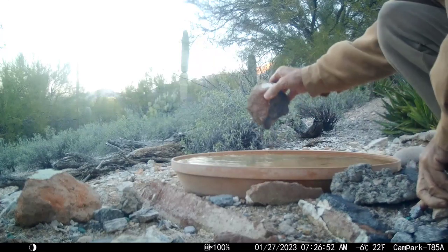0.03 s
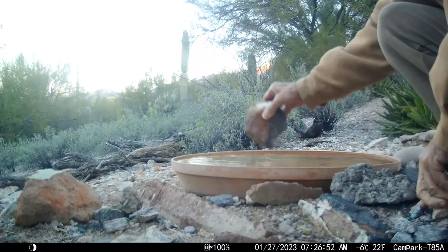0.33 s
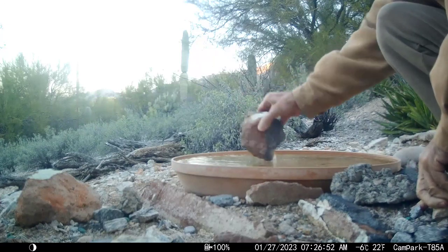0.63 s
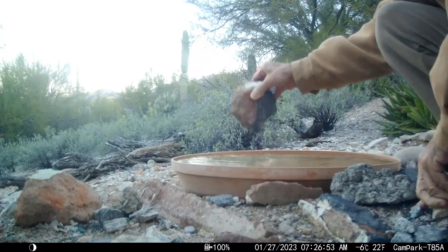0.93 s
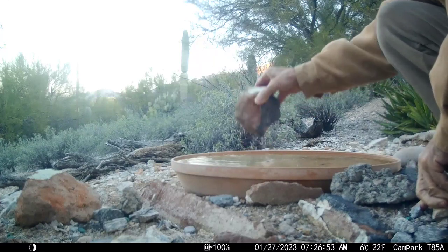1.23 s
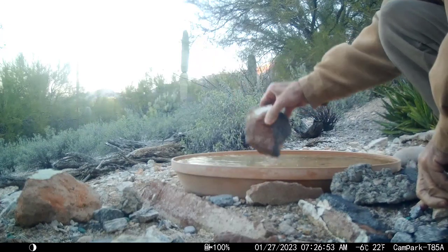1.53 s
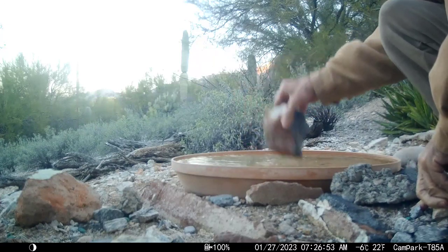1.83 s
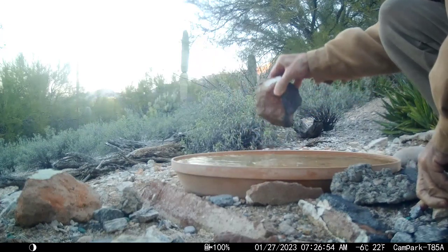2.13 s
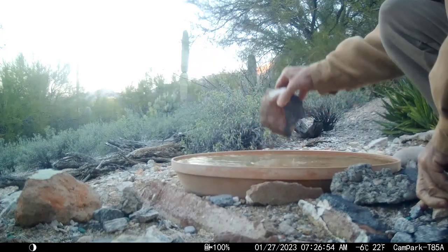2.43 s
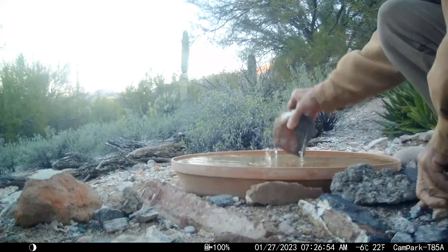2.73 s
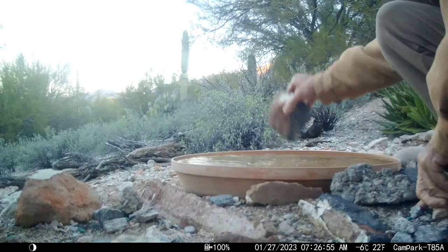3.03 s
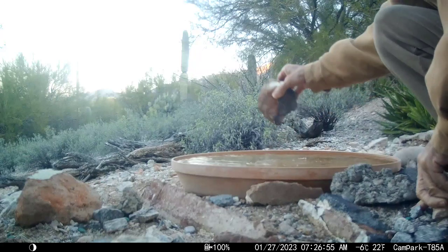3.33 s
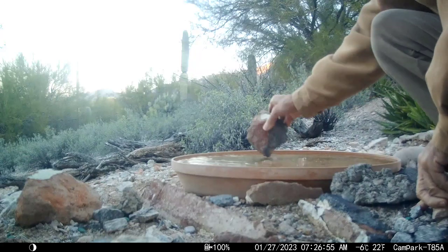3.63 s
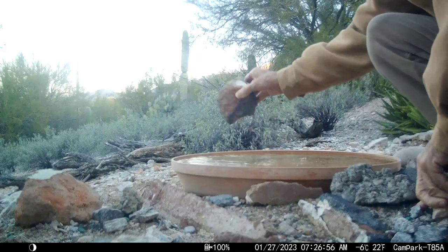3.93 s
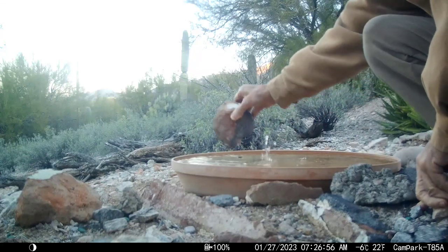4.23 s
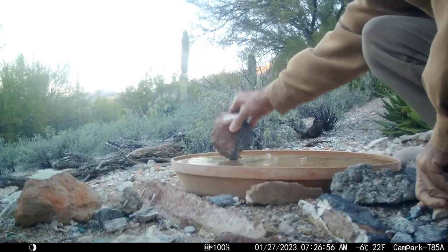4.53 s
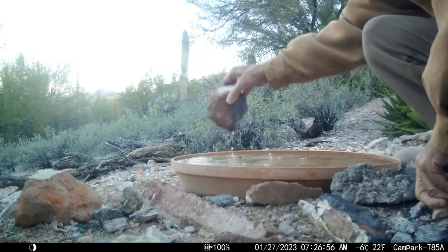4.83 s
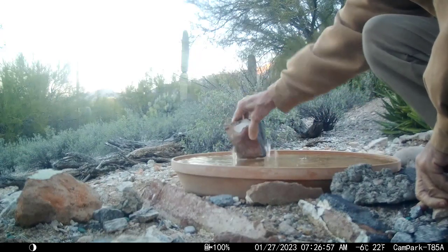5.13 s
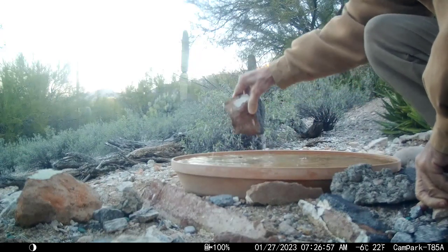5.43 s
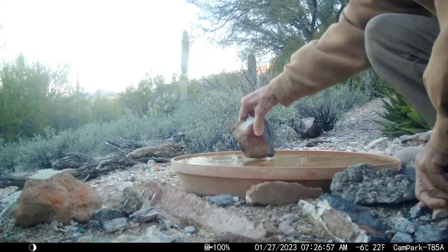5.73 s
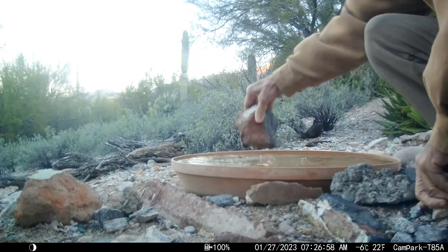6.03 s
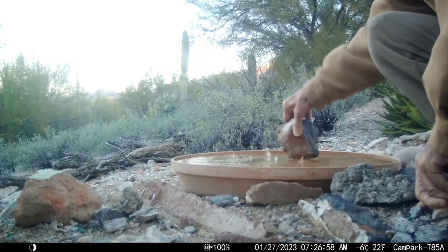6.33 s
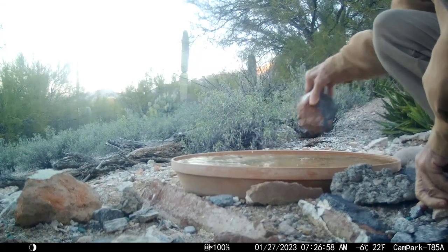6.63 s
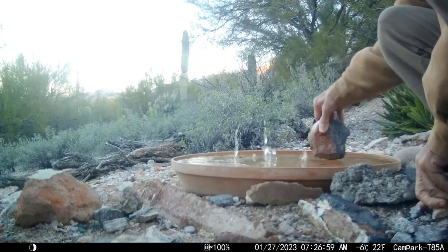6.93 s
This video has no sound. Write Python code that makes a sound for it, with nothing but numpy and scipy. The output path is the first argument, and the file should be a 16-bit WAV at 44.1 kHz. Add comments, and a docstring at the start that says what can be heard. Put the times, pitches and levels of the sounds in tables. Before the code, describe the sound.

Close by outdoors, a hand-held rock chops again and again at ice in a dish of water. Sharp cracks and short clacking knocks come in an even rhythm that eases a little toward the end. Between the hits, loose chips tick back onto the ice, fine spray falls, and small slaps and bubbles come from the water. A quiet hiss and low distant rumble lie behind, with no echo.

```python
"""Rock breaking ice in a dish

A hand-held rock strikes the ice in a shallow dish fifteen times, outdoors. Each impact excites the
modes of the dish and fractures the ice in a few bright snaps. Splinters and spray patter down, and
the water beneath slaps and plops as pockets of air resonate. Behind lie a faint rumble and an even hiss."""
import sys
import numpy as np
from scipy import signal
from scipy.fft import rfft, irfft
from scipy.io import wavfile

SR = 44100
rng = np.random.default_rng(int(sys.argv[2]) if len(sys.argv) > 2 else 0)


def pcm_store(signal):
    """Save signal as 16-bit PCM."""
    levels = np.round(np.clip(np.atleast_2d(signal), -1, 1) * 32767)
    wavfile.write(sys.argv[1], SR, levels.astype(np.int16).T)


N = 307818
AGE = np.arange(SR // 2) / SR   # time since the onset of an event [s]

# Levels in the tables are relative: each source applies its own gain.
# blows of the rock: (time [s], snap level [dB], snap ring [Hz], gap between the first two snaps [s],
# knock level [dB], knock pitch [Hz], clack level [dB], body level [dB], sway pitch [Hz], spray level [dB])
ROCK_BLOWS = [(0.272, -21, 5220, 0.004, -36.5, 1240, -38.5, -48, 68.6, -53.5),
              (0.6717, -22, 5100, 0.0046, -35.5, 950, -40, -43.5, 74, -54),
              (1.0891, -23, 5460, 0.004, -35.5, 1210, -39, -43, 115, -52.5),
              (1.511, -25, 6600, .003, -35, 940, -39.5, -43.5, 102, -51.5),
              (1.9138, -24.5, 5180, 0.0036, -37, 860, -54, -38.5, 82, -49.5),
              (2.3251, -31.5, 6300, 0.0029, -38, 925, -41, -39.5, 74, -52.5),
              (2.7327, -22.5, 6070, .002, -34, 1210, -44, -43, 167, -49.5),
              (3.1463, -22, 4800, .002, -35, 1020, -56, -42, 115, -47.5),
              (3.632, -24, 5400, .0025, -40.5, 1390, -37, -44.5, 107, -52),
              (4.1227, -20.5, 6000, 0.005, -37, 820, -37, -44, 89, -48.5),
              (4.5885, -22, 6900, 0.0047, -35, 930, -39, -50, 83, -45),
              (5.169, -25, 6700, 0.0043, -36.5, 940, -40.5, -44.5, 139, -45),
              (5.7769, -29.5, 5540, 0.0016, -47, 935, -50, -45.5, 87, -52),
              (6.378, -28, 6650, 0.0042, -39.5, 940, -46, -48.5, 95, -48.5),
              (6.9012, -26, 5570, 0.0044, -35, 1090, -34, -45, 159.6, -43.5)]
# the rock grinding on into broken ice: (time [s], level [dB], treble relative to that level [dB])
ICE_CRUNCHES = [(0.3086, -38, -6.5), (0.695, -36.5, -25), (0.7075, -38, -1.5), (1.1186, -38.5, -5),
                (1.5717, -44, -6), (1.927, -28, -33), (2.3358, -30.5, -4.5), (2.352, -33, -2.5),
                (2.759, -36.5, -3.5), (3.161, -40, -20), (3.198, -39, -5), (3.679, -43.5, -2.5),
                (4.1733, -31, -7), (4.6478, -31.5, -9), (5.185, -26.5, -5), (5.2233, -40.5, -3),
                (5.2425, -36, -6.5), (6.448, -45, -3), (6.492, -46, -29), (6.9077, -23.5, -7),
                (6.929, -41, -3)]
# loose chips falling back on the ice: (time [s], level [dB])
FALLING_CHIPS = [(0.7185, -42), (0.733, -45), (1.1657, -52), (2.009, -50.5), (2.831, -54), (3.7143, -48.5),
                 (4.211, -51), (4.255, -51.5), (4.643, -44), (4.658, -36), (5.2782, -49.5), (5.978, -54.5),
                 (6.954, -44), (6.978, -40)]
# water slapping back into the hole: (time [s], level [dB])
WATER_SLAPS = [(0.317, -44.5), (0.699, -41.5), (1.127, -52), (1.939, -36), (2.353, -37), (2.779, -44),
               (3.192, -34.5), (3.681, -42.5), (5.22, -43.5), (6.428, -35.5), (6.954, -45)]
# single bubbles and drips: (time [s], level [dB], starting pitch [Hz])
SINGLE_BUBBLES = [(2.335, -38, 1240), (4.291, -55.5, 4000), (4.76, -55, 1580), (5.236, -40.5, 2830),
                  (5.2437, -33.5, 1283), (6.428, -42, 1100), (6.511, -57, 1890), (6.629, -62, 4700),
                  (6.8428, -47.5, 1630)]
# normal modes of the ice: (frequency [Hz], bandwidth [Hz], added gain [ratio])
ICE_RESONANCES = [(5055, 130, 0.44), (5460, 98, 0.29), (6990, 140, 0.63), (8350, 16, 0.12)]

# spectral envelopes: (frequency [Hz], spectral level [dB])
AIR_SPECTRUM = [(12, -41), (20, -6), (87, -3), (122, -0.5), (180, -7), (306, -10.5), (372, -14.5),
                (439, -16.5), (705, -17.5), (1300, -24.5), (1410, -25.5), (1720, -28.5), (4810, -31),
                (13500, -31), (15500, -35.5)]   # outdoor rumble and hiss
ICE_SPECTRUM = [(1200, -18.5), (2400, -16), (3050, -17.5), (3300, -22), (4000, -9), (5200, -3), (6100, -5),
                (7200, -8), (8300, -6.5), (8900, -33), (16000, -86)]   # snapping ice
SPLINTER_SPECTRUM = [(3000, -30), (7000, -21), (9000, 4.5), (10800, 4), (12000, -7), (14000, -0.5),
                     (16000, -19)]   # treble of fine splinters
KNOCK_SPECTRUM = [(300, -9), (480, 1), (600, 2.5), (740, -1), (900, 5.5), (1150, -2), (1350, 1),
                  (1550, -15.5), (2100, -14.5), (3000, -11.5), (5000, -46)]   # midrange of the struck ice and dish
BODY_SPECTRUM = [(100, -8), (200, 0), (290, -0.5), (400, -2.5), (550, -10.5), (1200, -49)]   # body of the dish
CLACK_SPECTRUM = [(900, -21), (1400, 7), (1700, 6), (2000, -3.5), (2350, 0.5), (2700, -2.5), (3000, 0.5),
                  (3300, -4), (4500, -24.5)]   # hard contact of the rock
THUD_SPECTRUM = [(25, -34.5), (55, -3), (95, -5.5), (165, -2.5), (240, -7.5), (400, -10), (800, -18.5),
                 (1500, -24), (4000, -49)]   # bass of the impact
SPRAY_SPECTRUM = [(300, -16.5), (800, -6.5), (1300, -11.5), (1700, -11.5), (2700, -11.5), (3400, -15),
                  (4200, -6), (5400, 0), (6800, -3), (8300, -7.5), (10500, -8.5), (12000, -17),
                  (16000, -23)]   # falling splinters and drops
SLAP_SPECTRUM = [(100, -7), (250, 8), (500, -4.5), (900, -2), (1400, -6.5), (2000, -7.5), (3500, -18.5),
                 (8000, -26)]   # slapping water


def from_db(db):
    """Amplitude ratio of a level: a factor of ten for every 20 dB."""
    return 10 ** (np.asarray(db) / 20)


def rms_one(x):
    """Normalisation to unit mean power."""
    return x / np.sqrt(np.mean(x ** 2) + 1e-20)


def add(track, s, sound):
    """Superposition: a sound adds to the track from time s on."""
    start = int(round(s * SR))
    track[start:start + len(sound)] += sound[:max(N - start, 0)]


def colour(x, spectrum, size=4096):
    """Minimum-phase filtering to a spectral envelope; white noise keeps its power."""
    hz, db = np.transpose(spectrum)
    bins_hz = np.maximum(np.arange(size // 2 + 1) * SR / size, 1)
    magnitude = from_db(np.interp(np.log(bins_hz), np.log(hz), db))
    cepstrum = irfft(np.log(magnitude))
    cepstrum[1:size // 2] *= 2   # folding onto positive time makes the response causal
    cepstrum[size // 2 + 1:] = 0
    response = irfft(np.exp(rfft(cepstrum)))
    return signal.fftconvolve(x, response / np.linalg.norm(response))[:len(x)]


def resonate(x, hz, width_hz):
    """Forced response of a damped oscillator, with unit gain at resonance."""
    r = np.exp(-np.pi * width_hz / SR)
    numerator = np.array([1, 0, -1]) * (1 - r * r) / 2
    return signal.lfilter(numerator, [1, -2 * r * np.cos(2 * np.pi * hz / SR), r * r], x)


def ringing(x, hz, width_hz, gain):
    """Resonant emphasis: the response of one mode adds to the direct sound."""
    return x + gain * resonate(x, hz, width_hz)


def swell(rise_s, t60):
    """Smooth onset under an exponential decay of 60 dB in t60 seconds."""
    return (1 - np.exp(-(AGE / rise_s) ** 2)) * from_db(-60 * AGE / t60)


def grains(per_s, spread_db):
    """Shot noise: independent impulses of uneven size, at unit power."""
    sizes = from_db(spread_db * np.minimum(rng.exponential(1, len(AGE)), 4))
    signs = rng.choice([-1, 1], len(AGE))
    occurs = rng.random(len(AGE)) < per_s / SR
    return rms_one(sizes * signs * occurs)


def at_level(sound, envelope, db):
    """Energy scaling: a sound takes the energy of its envelope, shifted by db."""
    return sound * from_db(db) * np.linalg.norm(envelope) / (np.linalg.norm(sound) + 1e-12)


def burst(envelope, spectrum):
    """Source and filter: a dense run of tiny contacts is heard through a body."""
    return colour(envelope * grains(per_s=20000, spread_db=1.5), spectrum)


def air(level_db=-57):
    """Stationary noise: distant outdoor rumble under an even microphone hiss."""
    noise = colour(rng.standard_normal(N + SR), AIR_SPECTRUM)[SR:]
    return from_db(level_db) * rms_one(noise)


def fractures(run_on_count=3, run_on_gap_s=0.004, run_on_db=-12, loss_db=5.5,
              crunch_hz=5900, crumble_s=0.007, crumble_db=-9):
    """Brittle failure proceeds in steps: blows and crunches run on in weaker snaps; chips strike once."""
    # rows: (time [s], level [dB], ring [Hz], relative treble [dB], t60 [s])
    chip_hz, chip_treble_db, chip_t60 = 5550, -5, 0.025
    snap_treble_db, snap_t60, crunch_t60 = -49, 0.018, 0.03
    rows = [(s, db, chip_hz, chip_treble_db, chip_t60) for s, db in FALLING_CHIPS]
    for s, db, hz, gap_s, *_ in ROCK_BLOWS:
        rows += [(at, db, hz, snap_treble_db, snap_t60) for at in (s, s + gap_s)]
        run_on_times = s + gap_s + np.cumsum(run_on_gap_s * (0.5 + rng.random(run_on_count)))
        for k, at in enumerate(run_on_times):
            rows.append((at, db + run_on_db - loss_db * k, crunch_hz, snap_treble_db, snap_t60))
    for s, db, treble_db in ICE_CRUNCHES:
        hz = crunch_hz * np.exp(0.05 * rng.standard_normal())
        crumble_at = s + crumble_s * (0.5 + rng.random())
        rows += [(s, db, hz, treble_db, crunch_t60),
                 (crumble_at, db + crumble_db, hz, treble_db, crunch_t60)]
    return rows


def ice_cracks(ice_db=2.5, splinter_db=1.0):
    """Acoustic emission: fractures excite the modes of the ice and a ring set by the breaking piece."""
    out = np.zeros(N)
    for s, db, hz, treble_db, t60 in fractures():
        envelope = swell(rise_s=0.00021, t60=t60)
        snap = ringing(burst(envelope, ICE_SPECTRUM), hz, width_hz=400, gain=1.0)
        for mode in ICE_RESONANCES:
            snap = ringing(snap, *mode)
        splinters = burst(envelope, SPLINTER_SPECTRUM)
        add(out, s, at_level(snap, envelope, db + ice_db))
        add(out, s, at_level(splinters, envelope, db + treble_db + splinter_db))
    return out


def dish_knocks(knock_gain_db=5.0, clack_gain_db=8.5, body_gain_db=8.0,
                thud_gain_db=-4.5, sway_gain_db=-1.0):
    """Impact excitation: the rock loads the ice sheet and dish, whose lowest vibrations last longest."""
    out = np.zeros(N)
    clack_shape = swell(rise_s=0.0031, t60=0.039)
    knock_shape = swell(rise_s=0.0023, t60=0.048)
    body_shape = swell(rise_s=0.00088, t60=0.042)
    thud_shape = swell(rise_s=0.0025, t60=0.49)
    sway_shape = swell(rise_s=0.013, t60=0.2)
    for s, _, _, _, knock_db, knock_hz, clack_db, body_db, sway_hz, _ in ROCK_BLOWS:
        impact_db = (knock_db + body_db) / 2
        # which modes ring most depends on where the rock lands
        body_hz = 283 * np.exp(0.068 * rng.standard_normal())
        knock = ringing(burst(knock_shape, KNOCK_SPECTRUM), knock_hz, width_hz=130, gain=1.0)
        body = ringing(burst(body_shape, BODY_SPECTRUM), body_hz, width_hz=70, gain=2.7)
        clack = burst(clack_shape, CLACK_SPECTRUM)
        thud = burst(thud_shape, THUD_SPECTRUM)
        sway = sway_shape * np.sin(2 * np.pi * sway_hz * AGE)   # the sheet oscillates on the water
        add(out, s, at_level(knock, knock_shape, knock_db + knock_gain_db))
        add(out, s, at_level(body, body_shape, body_db + body_gain_db))
        add(out, s, at_level(clack, clack_shape, clack_db + clack_gain_db))
        add(out, s, at_level(thud, thud_shape, impact_db + thud_gain_db))
        add(out, s, at_level(sway, sway_shape, impact_db + sway_gain_db))
    return out


def spray(patter_db=7.0, drops_db=-13.5, drop_hz=5400, pitch_spread=0.27, pitch_count=6):
    """Random impacts: splinters and water patter after each blow; later drops set the ice ringing."""
    out = np.zeros(N)
    for s, *_, db in ROCK_BLOWS:
        patter = swell(rise_s=0.016, t60=0.32) * grains(per_s=3000, spread_db=2.5)
        pitches = drop_hz * np.exp(pitch_spread * rng.standard_normal(pitch_count))
        taps = sum(resonate(grains(per_s=45, spread_db=7.5), hz, width_hz=520) for hz in pitches)
        drops = swell(rise_s=0.041, t60=0.52) * rms_one(taps)
        add(out, s, from_db(db) * (from_db(patter_db) * patter + from_db(drops_db) * drops))
    return colour(out, SPRAY_SPECTRUM)


def air_pockets(slosh_delay_s=0.068, slosh_db=-17.5):
    """Air entrainment: water closes in slaps, in a weaker slosh after each, and in single bubbles."""
    # rows: (time [s], level [dB], pitch [Hz], tonal share of the energy [0-1], t60 [s])
    slap_hz, slap_tonal, slap_t60 = 824, 0.04, 0.044
    bubble_tonal, bubble_t60 = 0.61, 0.038
    slaps = [(s, db, slap_hz, slap_tonal, slap_t60) for s, db in WATER_SLAPS]
    sloshes = [(s + slosh_delay_s, db + slosh_db, *rest) for s, db, *rest in slaps]
    bubbles = [(s, db, hz, bubble_tonal, bubble_t60) for s, db, hz in SINGLE_BUBBLES]
    return slaps + sloshes + bubbles


def water_plops(glide_per_s=10.0, slap_db=2.5, bubble_db=4.0):
    """Cavity resonance: a broad slap, and a briefer bubble whose pitch rises as it nears the surface."""
    out = np.zeros(N)
    for s, db, hz, tonal_share, t60 in air_pockets():
        slap_shape = swell(rise_s=0.00059, t60=t60)
        bubble_shape = swell(rise_s=0.001, t60=0.77 * t60)
        slap = ringing(burst(slap_shape, SLAP_SPECTRUM), hz, width_hz=0.8 * hz, gain=4.6)
        bubble = bubble_shape * np.sin(2 * np.pi * hz * AGE * (1 + glide_per_s * AGE / 2))
        add(out, s, np.sqrt(1 - tonal_share) * at_level(slap, slap_shape, db + slap_db))
        add(out, s, np.sqrt(tonal_share) * at_level(bubble, bubble_shape, db + bubble_db))
    return out


def scene():
    """Free-field superposition: ice, dish and water sound close by in the open air."""
    return (air() + ice_cracks() + dish_knocks() + spray() + water_plops())[None]


def record(dry, low_cut_hz=24, high_cut_hz=15600):
    """Band limiting: the microphone sheds the deepest rumble, and the top is cut steeply."""
    high_pass = signal.butter(2, low_cut_hz, "high", fs=SR, output="sos")
    low_pass = signal.ellip(10, 0.3, 70, high_cut_hz, fs=SR, output="sos")
    return signal.sosfilt(low_pass, signal.sosfilt(high_pass, dry))


dry = scene()
out = record(dry)
pcm_store(out)
```